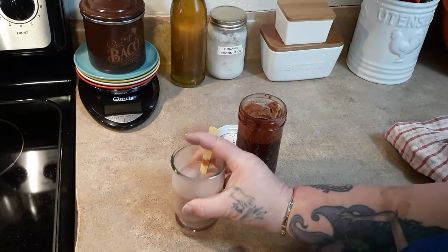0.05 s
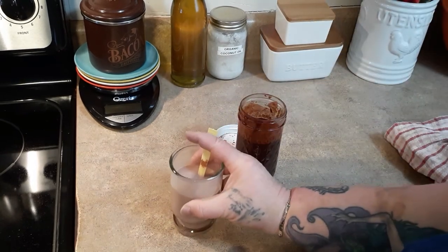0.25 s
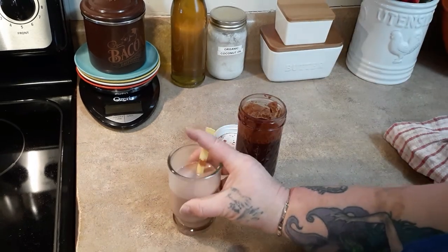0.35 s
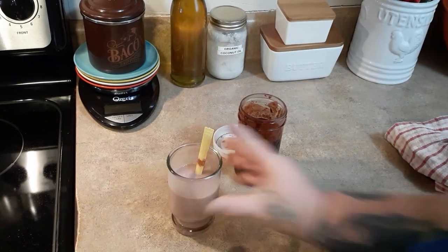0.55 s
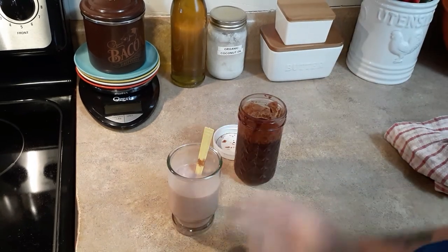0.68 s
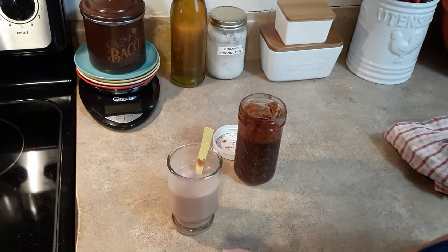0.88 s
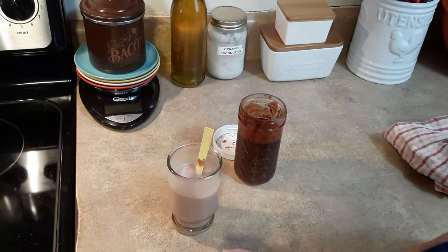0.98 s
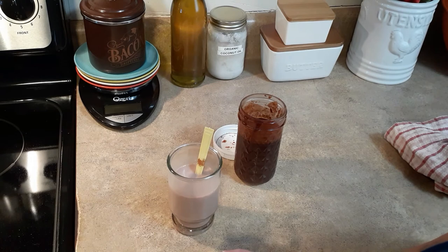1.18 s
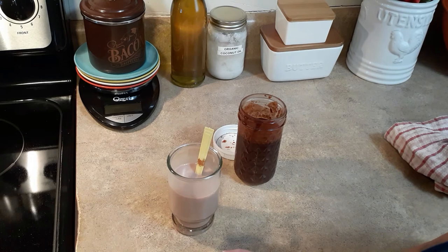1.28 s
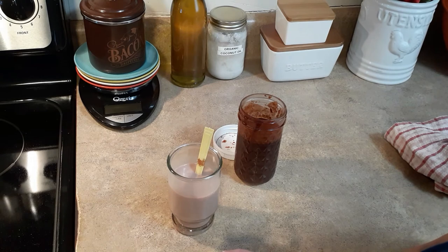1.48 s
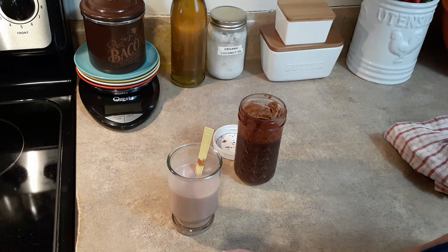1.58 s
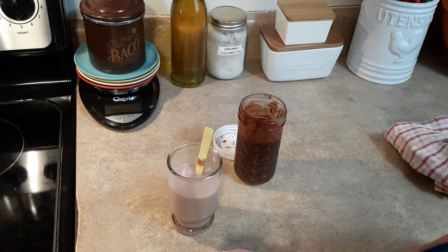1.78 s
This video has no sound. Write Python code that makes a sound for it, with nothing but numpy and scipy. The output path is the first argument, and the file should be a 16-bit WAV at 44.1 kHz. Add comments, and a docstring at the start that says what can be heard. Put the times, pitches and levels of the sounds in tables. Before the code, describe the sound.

Dull double knock of a heavy drinking glass on a countertop, followed by a quick hard clatter

```python
"""Over wavering room tone and a thin hiss line, band-limited noise bursts tick like a stick in a glass.
A hand rustles as a full, thick glass rocks onto a hollow counter: three main dull knocks, one weaker between,
each a soft push exciting decaying modes and gritty noise. Then something hard and light clatters nearby:
clumped noise, ringing modes and a low thud. Faint ticks and one very faint knock follow.
Wall echoes and a short diffuse tail place the knocks, clatter and ticks in a small hard kitchen."""
import sys
import numpy as np
from scipy import signal
from scipy.fft import rfft, irfft, next_fast_len
from scipy.io import wavfile
from scipy.ndimage import map_coordinates

SR = 44100
rng = np.random.default_rng(int(sys.argv[2]) if len(sys.argv) > 2 else 0)


def inscribe(sig):
    """Save sig as 16-bit PCM at rate SR to the path in sys.argv[1].

    A 1-D sig is mono; a 2-D sig holds one channel per row.
    Samples are clipped to [-1, 1] before scaling.
    """
    pcm = np.round(np.clip(np.atleast_2d(sig).T, -1, 1) * 32767)
    wavfile.write(sys.argv[1], SR, pcm.astype(np.int16))


def undo_db(level):
    """Turn decibels back into plain size, where 20 dB means ten times bigger."""
    steps = np.asarray(level, float) / 20
    return 10 ** steps


N = 81585  # length in samples
T = np.arange(SR // 4) / SR  # time axis of one event, s

# Room tone, relative spectral density: f/Hz, level/dB per Hz
HUSH_SPECTRUM = [(12, -56), (20, -17.5), (53, -3), (212, -7), (244, -1.5), (323, -10), (393, -8.5),
                 (535, -15.5), (1470, -13), (5210, -28), (11800, -26), (15200, -17.5), (16500, -51.5)]
# Left-right likeness of the room tone: f/Hz, likeness/1
HUSH_LIKENESS = [(60, 0.42), (240, 0.67), (950, 0.89), (3770, 0.067), (15000, .2)]
# Narrow electrical hiss, level before panning: t/s, level/dB
WHINE_LEVEL = [(0, -80), (.2, -63), (.6, -68), (1.1, -74), (1.3, -76), (1.85, -84.5)]
# Faint ticks and scrapes: t/s, onset level/dB, t60/s, centre f/Hz, width/octaves
TICK_EVENTS = [(.101, -49, .015, 13270, 0.41), (0.165, -42, .08, 8940, .6), (.168, -38.5, .03, 2800, 0.16),
               (.168, -33, .03, 8630, 0.12), (0.168, -53.5, .03, 12500, 0.082), (.177, -36, .01, 3088, .3),
               (.208, -53.5, .1, 4300, 0.23), (.177, -39.5, .02, 10470, .6), (.38, -48.5, .1, 8695, 0.09),
               (.38, -59.5, .1, 5206, 0.27), (.475, -57, 0.12, 8550, .12), (.475, -65.5, .1, 4360, 0.095),
               (.502, -60.5, 0.074, 9470, 0.22), (.561, -57, .02, 8900, .3),
               (1.222, -48, 0.029, 11860, 0.13), (1.224, -70.5, 0.016, 9100, 0.67),
               (1.343, -61, 0.039, 8370, 0.071), (1.341, -61.5, 0.041, 5750, .12),
               (1.506, -62.5, 0.011, 1790, 0.34), (1.524, -59, 0.014, 1710, 0.32),
               (1.608, -58, 0.0065, 4130, 0.69), (1.609, -62, 0.021, 350, 0.67),
               (1.78, -62, 0.0084, 2000, .6)]
# Hand sliding on the glass: t/s, level/dB
RUSTLE_LEVEL = [(.15, -95), (.19, -60.5), (.3, -64), (.37, -78), (.385, -61.5), (.46, -76), (.48, -54.5),
                (.56, -70.5), (.68, -87.5)]
# Colour of that rustle, relative spectral density: f/Hz, level/dB per Hz
SKIN_SPECTRUM = [(2500, -28), (4500, 3.5), (6800, -13), (8500, -2.5), (12000, -4), (15800, -7),
                 (17000, -41)]
# Landings of the glass: t/s, strength/dB, gripped base f/Hz, gain of counter modes below the base/dB,
# hardness (tilt of the counter modes from the base up)/dB per octave
KNOCK_EVENTS = [(0.2072, -5.5, 501, -7.5, -1.46), (0.3368, -25, 520, 0, -7), (0.3539, -6, 532, -5, 2.25),
                (0.4655, -16.5, 544, -1.5, -0.3), (1.52, -58.5, 260.3, -3, -3)]
# Modes of the hollow counter, relative to the base before boom and hardness: f/Hz, level/dB, t60/s
COUNTER_MODES = [(59.93, -29.5, 0.062), (108, -17, .1), (162, -12.5, 0.059), (200, -13, 0.056),
                 (298.7, -5.5, 0.11), (416, -14, 0.11), (605, -0.5, 0.045), (652, -4.5, 0.028),
                 (736, -9, 0.051), (907, -26, 0.02), (1003, -15.5, 0.068), (1295, -26, 0.02),
                 (1650, -15.5, 0.024), (1790, -27, 0.013), (2300, -34.5, 0.068), (2580, -20.5, 0.04)]
# Base grinding on the surface, relative spectral density: f/Hz, level/dB per Hz
GRIT_SPECTRUM = [(410, -20), (700, -8.5), (900, -18), (1270, -16.5), (1800, -22), (3260, -45), (6000, -72),
                 (7800, -109.5), (13200, -120)]
# Bounces: t/s, onset level/dB, rattle t60/s, tilt about 4 kHz/dB per octave, left-right/dB, thud level/dB
BOUNCES = [(0.7355, -18, 0.031, 5, -8, -31.5), (.7822, -19, .03, 3.5, -14, -43),
           (.8078, -16, .04, 3, -1, -67), (0.8187, -30.5, .04, 4, -13, -43),
           (0.829, -30.5, 0.032, 0.5, 2.5, -60), (.858, -33, .04, 2.5, -15.5, -69),
           (.872, -39.5, 0.064, 1.5, -15.5, -64.5), (.886, -51, 0.02, -0.5, -8, -77),
           (.902, -32, 0.055, 4, 5.5, -73), (.935, -52.5, 0.11, 5, -8, -70),
           (1.082, -60.5, 0.12, 1, 1, -87)]
# Rattle before the tilt, relative spectral density: f/Hz, level/dB per Hz
RATTLE_SPECTRUM = [(180, -38.5), (300, -1), (513, -37.5), (587, 12), (649, -20.5), (730, -5.5), (1400, -8),
                   (2210, -2), (4170, -13), (5930, -18), (12800, -14), (15400, -23.5), (16500, -35.5)]
# Modes of the bouncing thing, relative to the rattle before the tilt: f/Hz, level/dB, t60/s
OBJECT_MODES = [(614, -13, .03), (1850, -12, .02), (2090, -8, .02), (2290, -10, .02), (2600, -10, .02),
                (4040, -9, .015), (8690, -12, .015), (12500, -12, .01), (13290, -12, .015)]
# Decay of the room: f/Hz, t60/s
ROOM_DECAY = [(100, 0.29), (500, 0.26), (2000, 0.37), (6000, 0.34), (15000, 0.073)]
# Left-right likeness of the room tail: f/Hz, likeness/1
ROOM_LIKENESS = [(100, .99), (500, .93), (1200, .2), (10000, .05)]
# Wall echoes, relative to the direct path before its pan: delay/s, level/dB, left-right/dB, left lag/s
WALL_ECHOES = [(.0055, -13, 1, .0002), (.0085, -10, -1, -.0002), (.0122, -7, -1, .0001),
               (.018, -12, 1, -.0002), (.026, -13, -1, .0002)]
# Left-right sensitivity of the two microphones: f/Hz, level/dB
PORT_BALANCE = [(100, 1), (600, -0.5), (2500, 1.5), (6000, -0.5), (14000, -1)]

HUSH_DB, HUSH_PAN_DB, HUSH_WAVER_DB = -66, -3, .7
WHINE_HZ, WHINE_HALF_WIDTH_HZ = 11500, 250
TICK_PAN_DB, TICK_WET_DB = -2.5, -6
KNOCK_PAN_DB, KNOCK_WET_DB = -4.5, -5.5
BASE_T60_S, PUSH_S, KNOCK_RISE_S = 0.058, 0.0001, 0.00047
GRIT_DB, GRIT_T60_S, GRIT_RISE_S = -9, 0.041, 0.0014
CLUMP_S, CLUMP_DB, RATTLE_RISE_S = .0012, 3, .0003
THUD_HZ, THUD_T60_S, THUD_RISE_S = 98, .16, .008
CLATTER_WET_DB = -2.5
LEFT_LAG_S, ROOM_ONSET_S = .0004, 0.002
LOW_CUT_HZ = 45


def unit(x):
    """Normalisation: scale to rms 1."""
    return x / np.sqrt(np.mean(x ** 2) + 1e-20)


def along(points, hz):
    """Interpolation of (f/Hz, value) points on a logarithmic frequency axis."""
    f, v = np.transpose(points)
    return np.interp(np.log(hz + 1), np.log(f + 1), v)


def filtered(x, response):
    """Linear filtering: multiply the spectrum of x by a response of frequency."""
    n = x.shape[-1]
    m = next_fast_len(n + 8192)
    spectrum = rfft(x, m) * response(np.fft.rfftfreq(m, 1 / SR))
    return irfft(spectrum, m)[..., :n]


def gain_over_time(curve):
    """Amplitude envelope: gain per sample from (t/s, level/dB) points."""
    return undo_db(np.interp(np.arange(N) / SR, *np.transpose(curve)))


def fade(t60):
    """Exponential damping: the level falls 60 dB in t60, which is at least 2 ms."""
    return undo_db(-60 * T / max(t60, .002))


def mode(hz, t60):
    """Free vibration: a damped sinusoid."""
    return np.sin(2 * np.pi * hz * T) * fade(t60)


def burst(noise, t60):
    """Damped noise, its energy set by the decay alone."""
    return unit(noise * fade(t60)) * np.sqrt(np.mean(fade(t60) ** 2))


def blend(pair, alike, gain):
    """Partial coherence: two noises mixed as mid and side to a left-right likeness."""
    def shares(hz):
        angle = np.arccos(np.clip(along(alike, hz), -1, 1)) / 2
        return gain(hz) * [np.cos(angle), np.sin(angle)]

    mid, side = filtered(pair, shares)
    return np.array([mid + side, mid - side])


def add(out, s, sound, pan_db, wet_db, lag_s=0):
    """Room response by convolution: direct path, wall echoes and a fresh diffuse tail."""
    # each frequency of the tail's noise decays at its own rate
    hz, t, z = signal.stft(rng.standard_normal((2, SR // 2)), SR, nperseg=256)
    decay = undo_db(-60 * t / along(ROOM_DECAY, hz)[:, None])
    tail = signal.istft(z * decay, SR, nperseg=256)[1]
    onset = (1 - np.exp(-np.arange(tail.shape[1]) / SR / ROOM_ONSET_S)) ** 2
    tail = blend(tail, ROOM_LIKENESS, np.ones_like) * onset
    path = undo_db(wet_db) * tail / np.linalg.norm(tail[0])
    # direct sound, left then right
    path[0, round(lag_s * SR)] += undo_db(pan_db / 2)
    path[1, 0] += undo_db(-pan_db / 2)
    for delay, db, side_db, skew_s in WALL_ECHOES:
        arrivals = [round((delay + skew_s + lag_s) * SR), round(delay * SR)]
        path[[0, 1], arrivals] += undo_db(db + np.array([side_db, -side_db]) / 2)
    heard = signal.fftconvolve(sound[None], path, axes=1)
    i = round(s * SR)
    out[:, i:i + heard.shape[1]] += heard[:, :N - i]


def hush():
    """Stationary noise, slightly modulated in level, plus a narrow resonance of electrical hiss."""
    tone = unit(blend(rng.standard_normal((2, N)), HUSH_LIKENESS, lambda f: undo_db(along(HUSH_SPECTRUM, f))))
    tone[0] = np.roll(tone[0], round(LEFT_LAG_S * SR))
    # random level points, 16 per second, joined smoothly
    waver = map_coordinates(rng.standard_normal(40), [np.arange(N) * 16 / SR])
    line = lambda f: 1 / (1 + ((f - WHINE_HZ) / WHINE_HALF_WIDTH_HZ) ** 2)
    whine = unit(filtered(rng.standard_normal((2, N)), line))
    sides = undo_db(np.array([[.5], [-.5]]) * HUSH_PAN_DB)
    return sides * (undo_db(HUSH_DB + HUSH_WAVER_DB * waver) * tone + gain_over_time(WHINE_LEVEL) * whine)


def ticks(out):
    """Impulsive excitation: sharp-edged, damped noise in a Gaussian band on an octave axis."""
    for s, db, t60, centre_hz, octaves in TICK_EVENTS:
        band = lambda f: np.exp(-.5 * (np.log2((f + 1) / centre_hz) / octaves) ** 2)
        tick = burst(filtered(rng.standard_normal(len(T)), band), t60)
        add(out, s, undo_db(db) * tick, TICK_PAN_DB, TICK_WET_DB, LEFT_LAG_S)


def hand():
    """Sliding friction: faint bright noise, independent in the two channels."""
    noise = filtered(rng.standard_normal((2, N)), lambda f: undo_db(along(SKIN_SPECTRUM, f)))
    return gain_over_time(RUSTLE_LEVEL) * unit(noise)


def glass(out):
    """Modal excitation by impact: a short soft push rings base and counter, with grinding friction noise."""
    push = np.exp(-.5 * (T[:60] / PUSH_S - 4) ** 2)
    for s, db, base_hz, boom_db, hard_db in KNOCK_EVENTS:
        ring = mode(base_hz, BASE_T60_S)
        for k, (hz, mode_db, t60) in enumerate(COUNTER_MODES):
            shift_db = boom_db if hz < base_hz else hard_db * np.log2(hz / base_hz)
            tone_db = mode_db + shift_db + rng.normal(0, 1)
            ring += (-1) ** k * undo_db(tone_db) * mode(hz, t60)  # alternating polarity
        grit = unit(filtered(rng.standard_normal(len(T)), lambda f: undo_db(along(GRIT_SPECTRUM, f))))
        grit = grit * fade(GRIT_T60_S) * (1 - np.exp(-(T / GRIT_RISE_S) ** 2))
        ring *= 1 - np.exp(-T / KNOCK_RISE_S)
        ring = -np.convolve(ring, push / push.sum())[:len(T)]
        add(out, s, undo_db(db) * (ring + undo_db(GRIT_DB) * grit), KNOCK_PAN_DB, KNOCK_WET_DB)


def clatter(out):
    """Repeated impact: dense clumped contacts as noise, with modes of the object and a low damped thud."""
    for s, db, t60, tilt_db, pan_db, thud_db in BOUNCES:
        # uneven contact strengths, then slower clumps
        contacts = rng.standard_normal(len(T)) * undo_db(6 * rng.standard_normal(len(T)))
        contacts *= undo_db(CLUMP_DB * map_coordinates(rng.standard_normal(len(T)), [T / CLUMP_S]))
        colour = lambda f: undo_db(along(RATTLE_SPECTRUM, f) + tilt_db * np.log2((f + 1) / 4000))
        rattle = burst(filtered(contacts, colour), t60) * np.minimum(T / RATTLE_RISE_S, 1)
        ring = np.zeros(len(T))
        for hz, mode_db, life in OBJECT_MODES:
            tone_db = mode_db + tilt_db * np.log2(hz / 4000) + rng.normal(0, 2.5)
            ring += undo_db(tone_db) * mode(hz, life)
        thud = mode(THUD_HZ, THUD_T60_S) * (1 - np.exp(-(T / THUD_RISE_S) ** 2))
        bounce = undo_db(db) * (rattle + ring) + undo_db(thud_db) * thud
        add(out, s, bounce, pan_db, CLATTER_WET_DB, LEFT_LAG_S)


def scene():
    """Superposition of all sources in the kitchen."""
    out = hush() + hand()
    for add_source in (ticks, glass, clatter):
        add_source(out)
    return out


def low_pass(x):
    """Removes everything above the highest recorded frequency."""
    return signal.sosfilt(signal.butter(12, 16830, fs=SR, output="sos"), x)


def record(dry):
    """Transduction by two microphones of unequal sensitivity, with a high-pass filter."""
    ports = filtered(dry, lambda f: undo_db(np.array([[.5], [-.5]]) * along(PORT_BALANCE, f)))
    low_cut = signal.butter(3, LOW_CUT_HZ, 'high', fs=SR, output='sos')
    return low_pass(signal.sosfilt(low_cut, ports))


dry = scene()
out = record(dry)
inscribe(out)
```